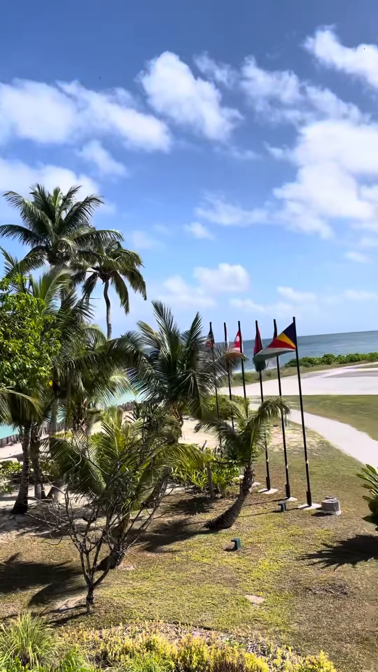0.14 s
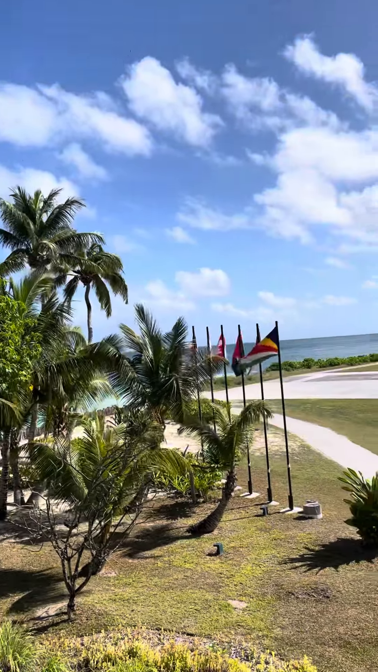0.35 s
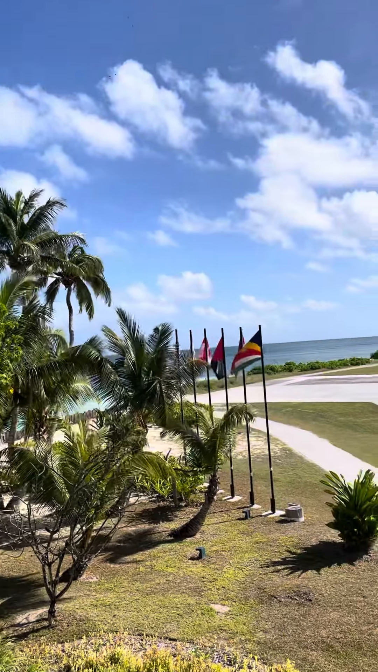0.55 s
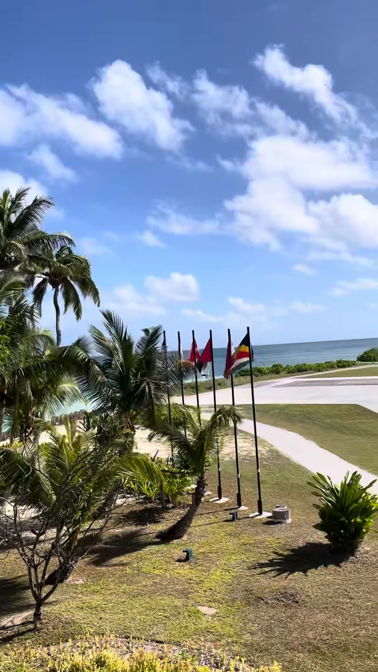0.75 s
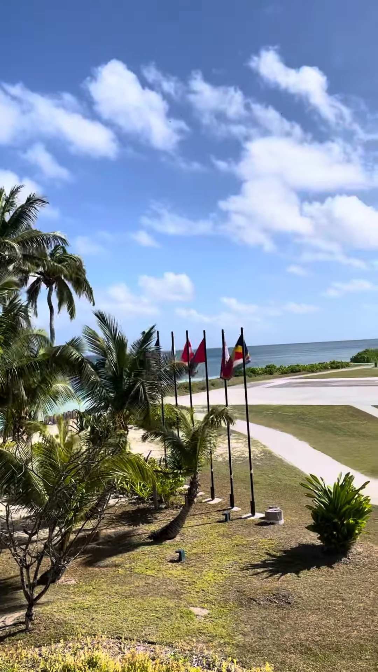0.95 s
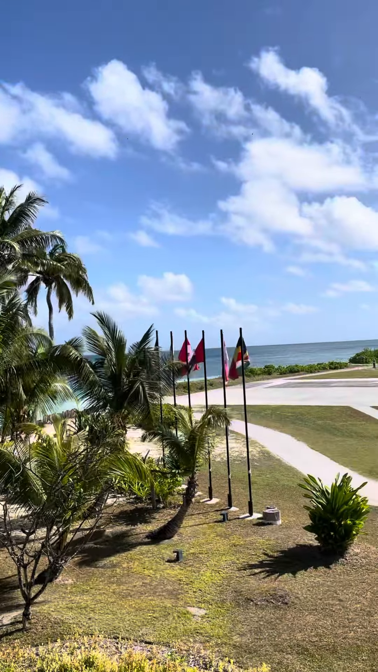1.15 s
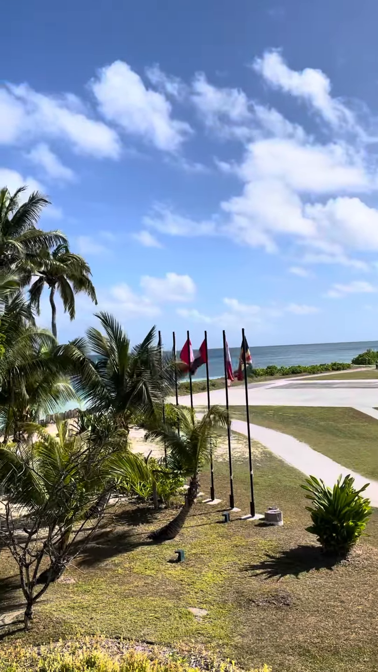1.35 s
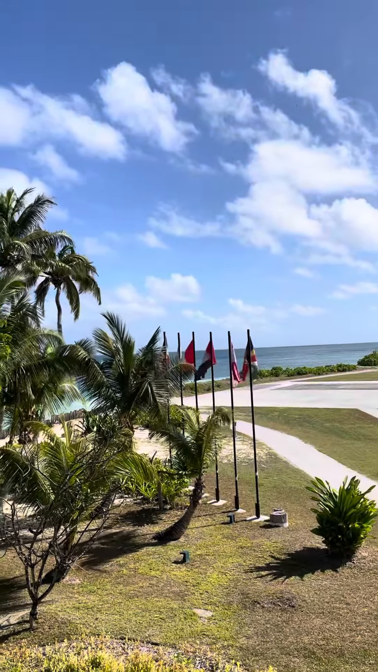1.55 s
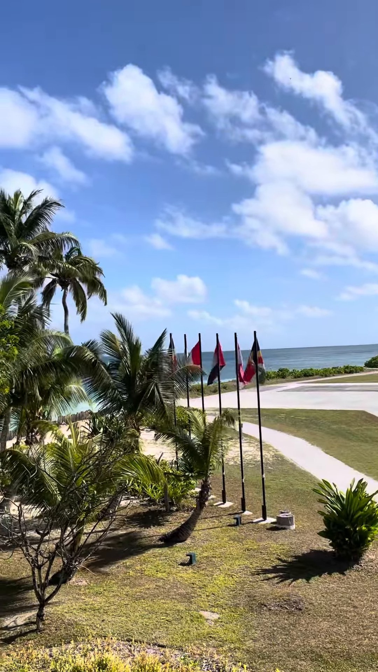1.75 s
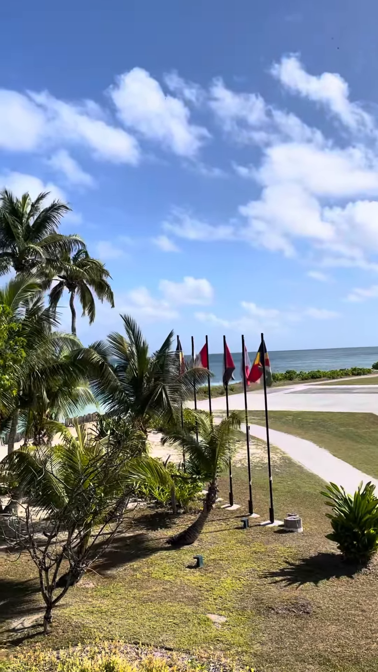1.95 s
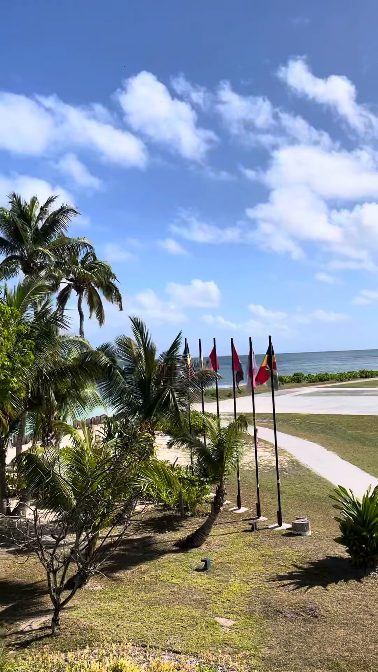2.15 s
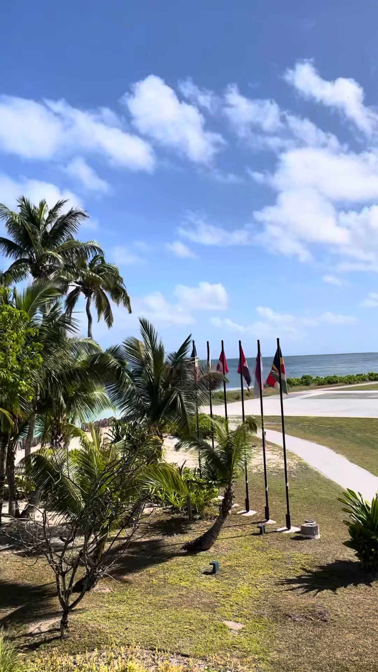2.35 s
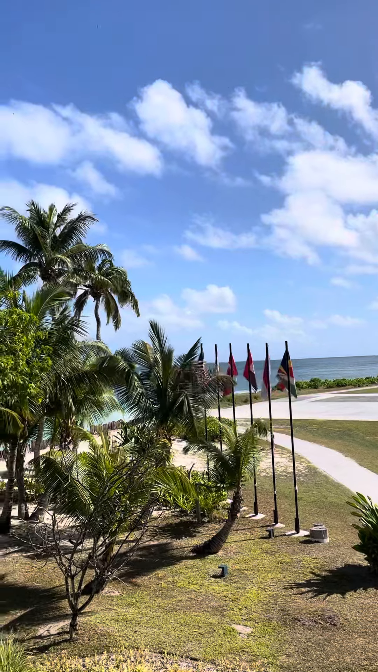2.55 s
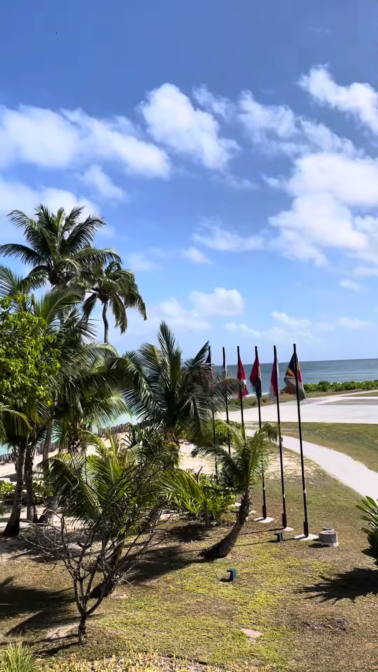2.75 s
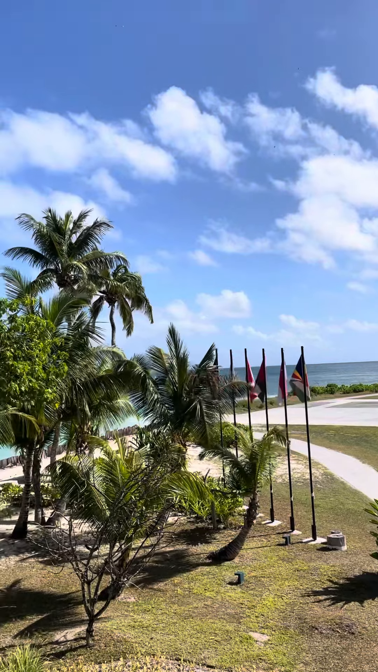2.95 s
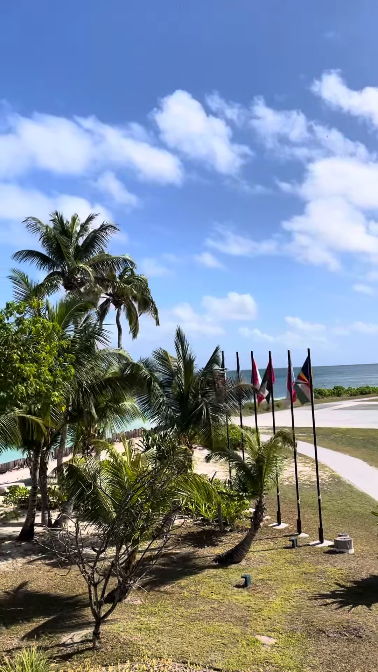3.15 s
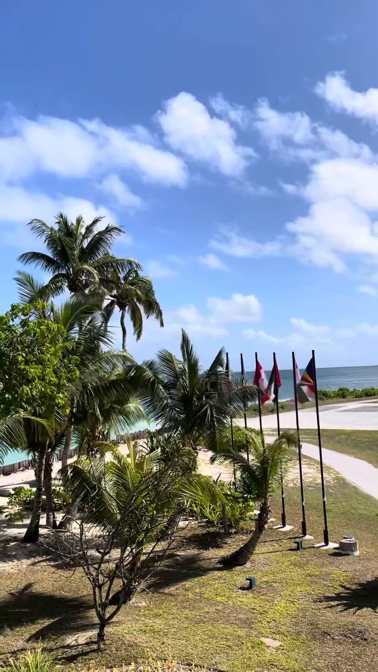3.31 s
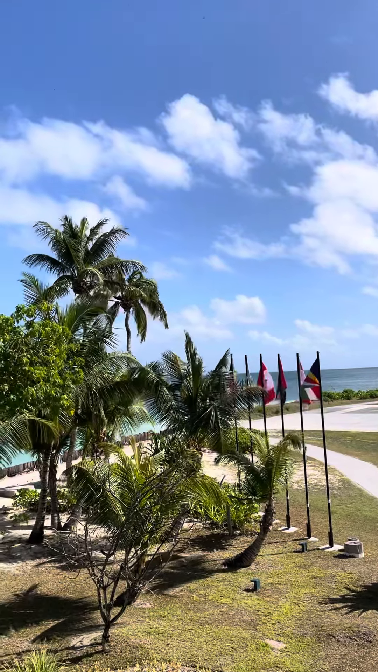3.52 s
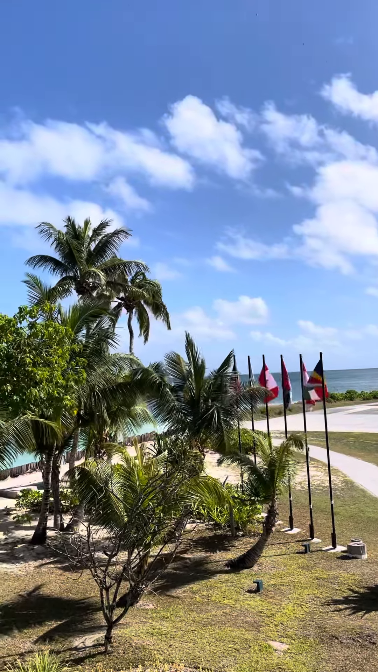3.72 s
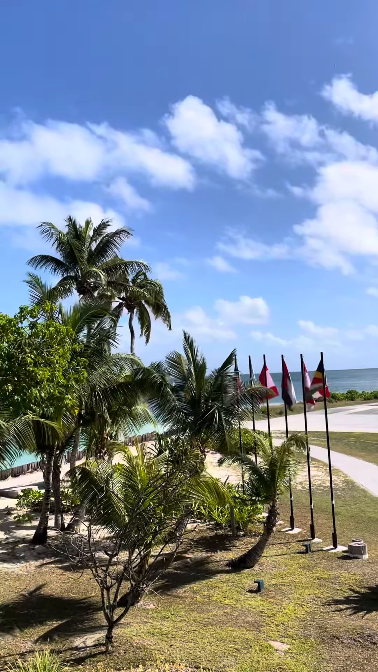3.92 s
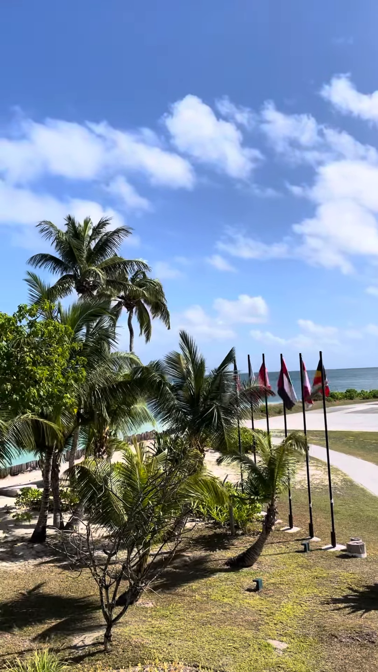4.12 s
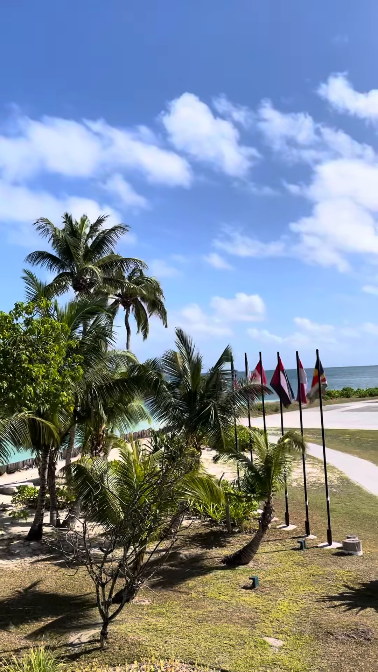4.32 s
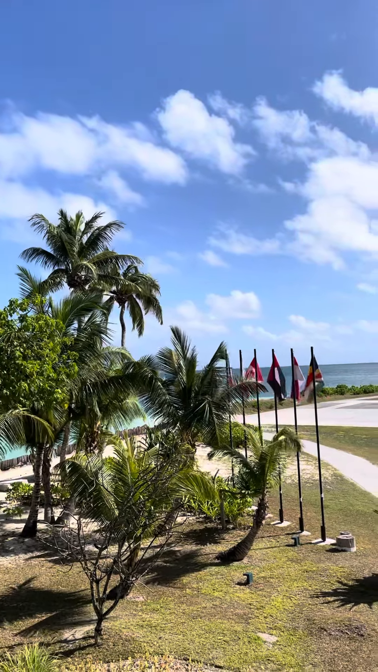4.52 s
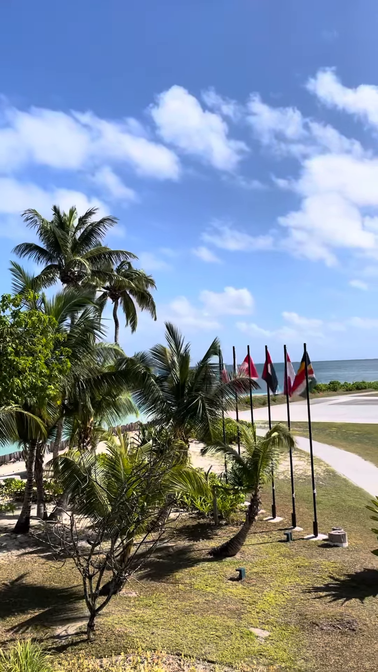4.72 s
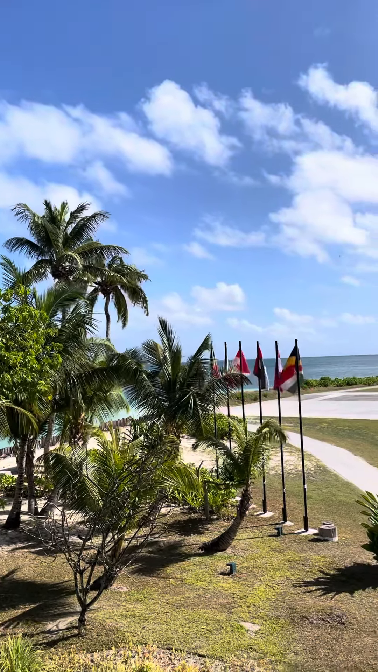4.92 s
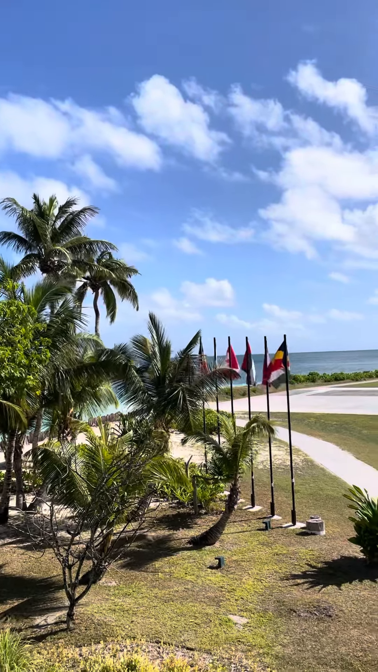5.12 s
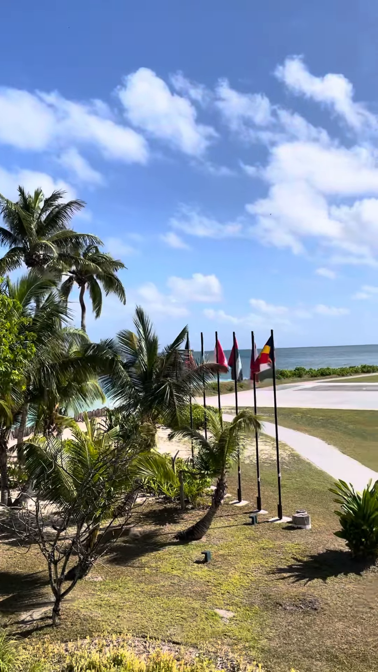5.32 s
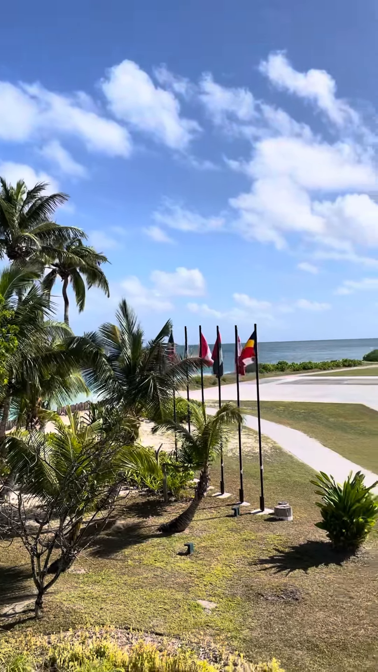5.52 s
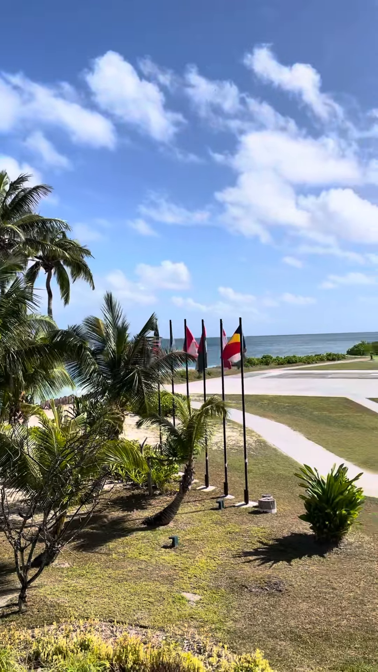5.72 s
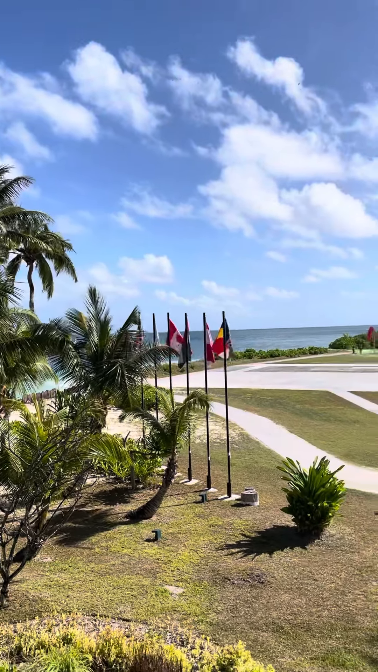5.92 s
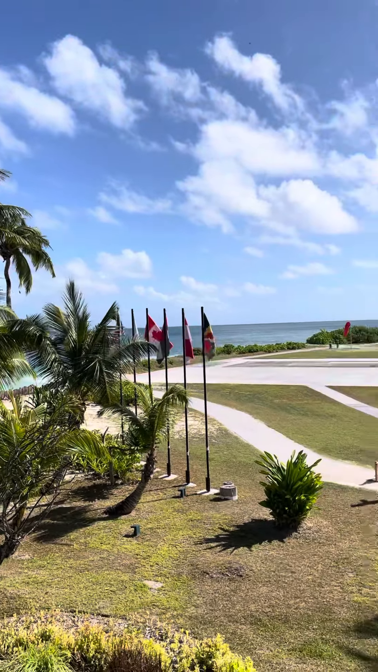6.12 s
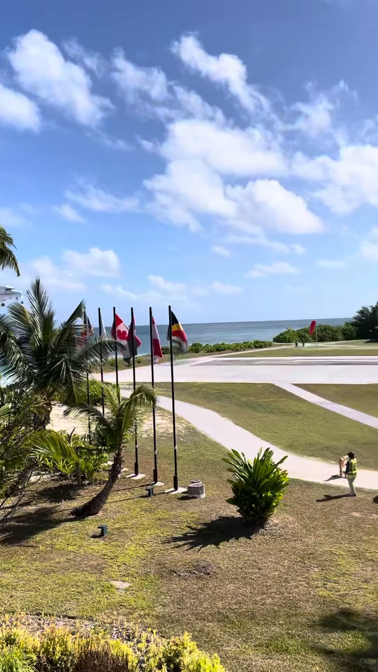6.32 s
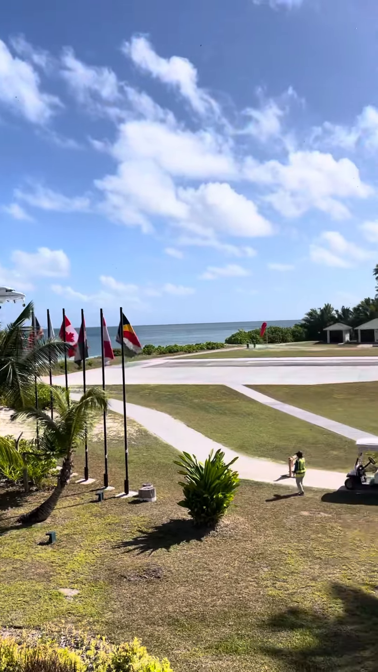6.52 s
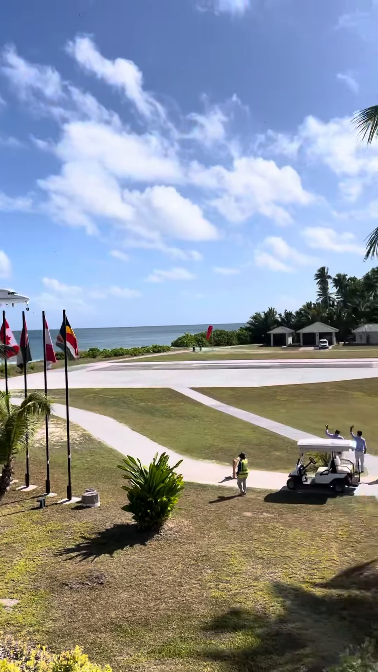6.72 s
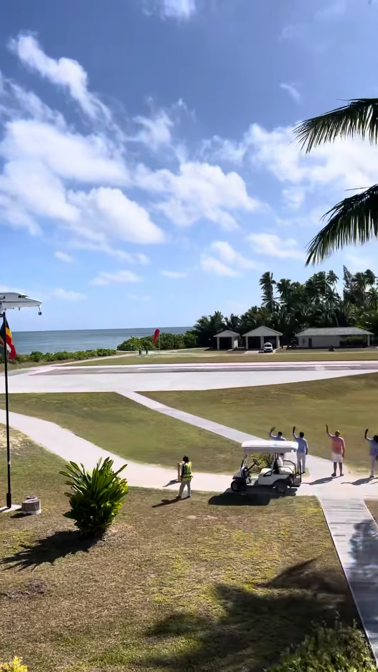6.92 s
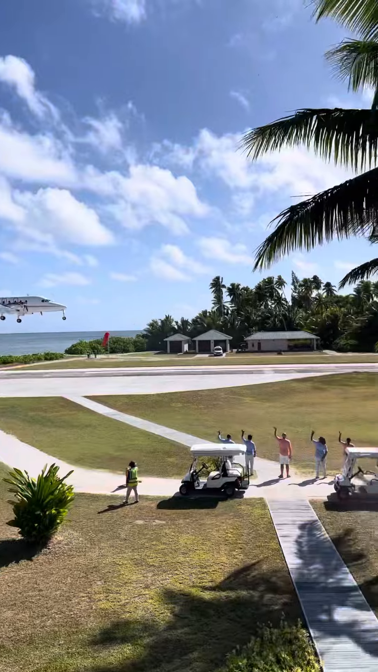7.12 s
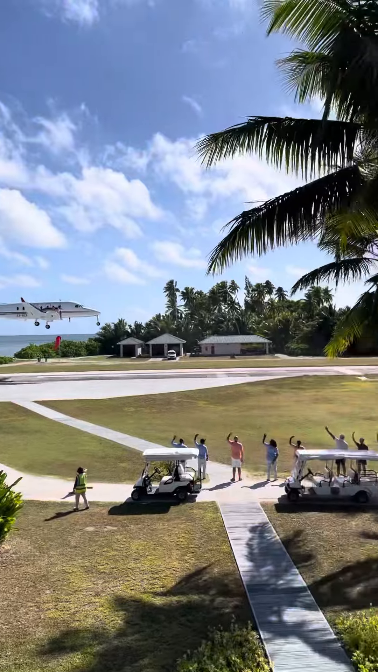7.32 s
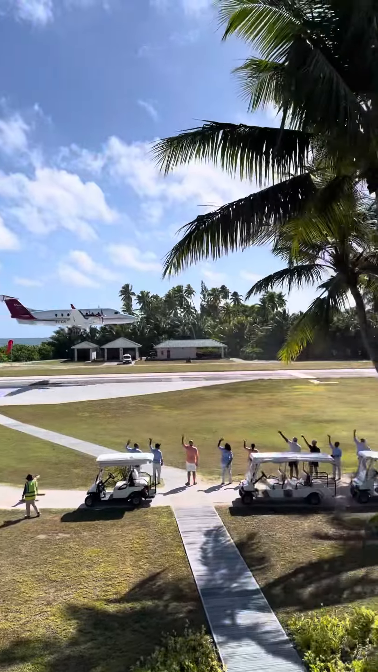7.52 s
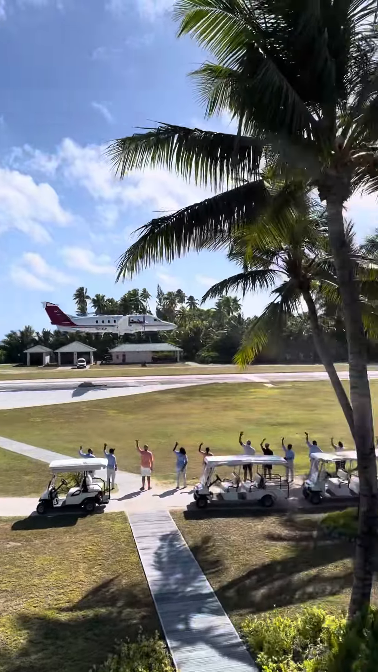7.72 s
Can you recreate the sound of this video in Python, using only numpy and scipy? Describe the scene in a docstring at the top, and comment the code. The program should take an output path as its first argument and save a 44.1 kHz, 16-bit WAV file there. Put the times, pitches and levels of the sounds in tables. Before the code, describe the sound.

A small twin turboprop approaches from far off, its hollow rushing roar building over quiet surf and light wind on the microphone. Early on come a faint insect buzz and two tiny bird ticks, then a short microphone bump. The propeller hum swells, and the high whine and hiss turn suddenly brighter as the plane nears. Its tones slide down as it goes by close to the listener.

```python
"""Surf and breeze on a shore, with a faraway roar; an insect buzzes once, then a small bird ticks twice.
The roar grows into a twin turboprop that comes in low and passes close by on its way to the runway.
Its exhaust and churned air rush, made hollow by an echo off the ground. Its propeller blades hum and
its turbines whine, brighter once it clears the palms. The tones sink as it goes by (Doppler effect)."""
import sys
import numpy as np
from scipy import signal
from scipy.fft import rfft, irfft, next_fast_len
from scipy.io import wavfile
from scipy.ndimage import uniform_filter1d, map_coordinates

SR = 44100
rng = np.random.default_rng(int(sys.argv[2]) if len(sys.argv) > 2 else 0)


def inscribe(sig):
    """Save sig as 16-bit PCM at rate SR to the path in sys.argv[1].

    A 1-D sig is mono; a 2-D sig holds one channel per row.
    Samples are clipped to [-1, 1] before scaling.
    """
    pcm = np.round(np.clip(np.atleast_2d(sig).T, -1, 1) * 32767)
    wavfile.write(sys.argv[1], SR, pcm.astype(np.int16))


N = 346493
T = np.arange(N) / SR


def amp(db):
    """Turn decibels into a gain to multiply by."""
    return 10 ** (np.asarray(db) / 20)


def unit(x):
    """Scale a signal to an average (rms) level of 1."""
    return x / np.sqrt(np.mean(x ** 2) + 1e-20)


def step(x, middle, width):
    """A smooth rise from 0 to 1."""
    return .5 + .5 * np.tanh((x - middle) / (2 * width))


def bump(x, middle, width):
    """A bell shape of height 1."""
    return np.exp(-((x - middle) / width) ** 2)


def along(points, hz):
    """Read between (Hz, value) rows on a logarithmic frequency scale."""
    known_hz, values = np.transpose(points)
    return np.interp(np.log(hz + 1), np.log(known_hz + 1), values)


def over_time(rows):
    """Join (seconds, value) rows into one value per sample."""
    return np.interp(T, *np.transpose(rows))


def turning(hz):
    """The running phase, in radians, of a changing frequency."""
    return 2 * np.pi * np.cumsum(hz) / SR


def wobble(rate):
    """A smooth random curve of level 1, through `rate` points a second."""
    points = rng.standard_normal(int(N * rate / SR) + 4)
    return unit(map_coordinates(points, [T * rate]))


def filtered(x, response):
    """Give each frequency in x the gain response(hz)."""
    size = next_fast_len(N + SR // 4)
    return irfft(rfft(x, size) * response(np.fft.rfftfreq(size, 1 / SR)), size)[..., :N]


def delayed(x, ms):
    """Delay one channel by a steady or changing time."""
    return map_coordinates(x, [(T - ms / 1e3) * SR], order=3, mode="mirror")


def fuzzy_tone(phase, width_hz):
    """A band of noise of level 1, centred on a moving pitch."""
    def band(hz):
        return 1 / np.sqrt(1 + (hz / width_hz) ** 2 + (hz / (1.7 * width_hz)) ** 10)
    a, b = filtered(rng.standard_normal((2, N)), band)
    return unit(a * np.cos(phase) + b * np.sin(phase))


def fuzzy_tones(tones, phase):
    """Several bands of noise, each on a multiple of one moving pitch."""
    return sum(amp(db) * fuzzy_tone(multiple * phase, width_hz) for multiple, width_hz, db in tones)


# How alike left and right are for aircraft and insect. Each row: frequency in Hz, likeness from 0 to 1.
LIKENESS = [(100, 1), (300, 1), (700, 0.89), (1000, 0.91), (2200, 1), (5000, 0), (6500, 0.86), (9500, 1)]


def rush(spectrum, likeness=LIKENESS):
    """Stereo noise of level 1; the spectrum sets only its tone colour."""
    def colour(hz):
        spread = np.arccos(np.clip(along(likeness, hz), 0, 1)) / 2
        return amp(along(spectrum, hz)) * [np.cos(spread), np.sin(spread)]
    mid, side = filtered(rng.standard_normal((2, N)), colour)
    return unit(np.array([mid + side, mid - side]))


# The tone colours of surf and breeze. Each row: frequency in Hz, relative level in dB.
SURF_COLOUR = [(20, -40), (40, -9), (60, 1.5), (135, 4.5), (190, -5.5), (280, 0.5), (500, -5), (800, -6),
               (1100, -5), (1650, -19.5), (3000, -18), (6000, -34), (8000, -84), (15000, -64)]
BREEZE_COLOUR = [(15, -53.5), (35, -6), (60, 11.5), (100, -4.5), (200, -12), (600, -53.5), (2000, -120)]
# How alike left and right are for both. Each row: frequency in Hz, likeness from 0 to 1.
SHORE_LIKENESS = [(60, 0.82), (300, 0.93), (1000, 0.77), (3000, 0.84)]
# Puffs of breeze. Each row: middle in seconds, level in dB, half length in seconds.
BREEZE_PUFFS = [(0.313, -27, 0.036), (2.295, -26.5, 0.05), (2.844, -30, 0.068), (3.018, -41, 0.11),
                (4.13, -30, 0.017), (6.578, -32, 0.029), (7.05, -31, 0.22)]


def shore():
    """Surf rushes steadily while the breeze buffets the microphone in soft puffs."""
    surf = amp(-33.5 + 0.45 * wobble(6.7)) * rush(SURF_COLOUR, SHORE_LIKENESS)
    surf[1] = delayed(surf[1], ms=0.13)  # the sea lies to the left
    puffs = sum(amp(db) * bump(T, s, half_s) for s, db, half_s in BREEZE_PUFFS)
    breeze = (puffs + amp(-52.5 + 3 * wobble(11.0))) * rush(BREEZE_COLOUR, SHORE_LIKENESS)
    return surf + breeze


def thump(s, db, hz, half_s):
    """One soft, low thump at the microphone."""
    return amp(db) * bump(T, s, half_s) * np.sin(2 * np.pi * hz * (T - s))


# The tone colour of the buzz. Each row: frequency in Hz, relative level in dB.
INSECT_COLOUR = [(3500, -21), (4450, 1), (4900, 8.5), (5300, 2), (5750, -1), (6300, -18), (7500, -42)]


def insect(start_s=0.22, end_s=0.56, edge_s=0.026):
    """An insect buzzes once: a short burst of high, trembling noise."""
    buzzing = step(T, start_s, edge_s) - step(T, end_s, edge_s)
    return buzzing * amp(-50.5 + 1.5 * wobble(60)) * rush(INSECT_COLOUR)


# The bird's ticks. Each row: middle in seconds, level in dB, starting pitch in Hz, ending pitch in Hz.
BIRD_TICKS = [(1.8015, -49.5, 12200, 5900), (1.857, -48.5, 11100, 6800)]


def bird(half_s=0.0042, half_fall_s=0.0092, leaves_db=-2, tail_s=0.12):
    """A small bird makes quick falling ticks, and the leaves scatter each into a short tail."""
    ticks = np.zeros(N)
    for s, db, start_hz, end_hz in BIRD_TICKS:
        glide_hz = np.interp(T, [s - half_fall_s, s + half_fall_s], [start_hz, end_hz])
        ticks += amp(db) * bump(T, s, half_s) * np.sin(turning(glide_hz))
    tail = rng.standard_normal((2, SR // 4)) * amp(-60 * T[:SR // 4] / tail_s)
    scatter = signal.fftconvolve(ticks[None], tail / np.linalg.norm(tail[0]), axes=1)[:, :N]
    return ticks + amp(leaves_db) * scatter


SPEED_M_PER_S, SOUND_M_PER_S = 40, 343
MACH = SPEED_M_PER_S / SOUND_M_PER_S


def flight(closest_m=38.45, side_on_s=7.66):
    """On a straight flight: our distance and angle off the nose when the sound left the aircraft."""
    past_m = SPEED_M_PER_S * (T - side_on_s + closest_m / SOUND_M_PER_S)
    squeeze = 1 - MACH ** 2
    range_m = (np.sqrt(past_m ** 2 + squeeze * closest_m ** 2) - MACH * past_m) / squeeze
    return range_m, np.degrees(np.arctan2(closest_m, MACH * range_m - past_m))


def carried(range_m, air_db_per_m=0):
    """Sound spreads out and is soaked up by the air; the gain is 1 at 100 metres."""
    return 100 / range_m * amp(-air_db_per_m * (range_m - 100))


def chopped(phase, in_open, depth=0.15):
    """A gain that pulses once for each passing blade when the aircraft is in the open."""
    return 1 + depth * in_open * np.cos(phase)


# Brief swells and dips. Each row: middle in seconds, half length in seconds, then the change in dB
# of the propeller wash, of the hiss and of the whine.
SWELLS_AND_DIPS = [(6.283, 0.046, 0.8, 0.5, 1), (6.599, 0.024, 0, -1.7, 3), (6.674, 0.056, -3.5, 2.4, 1.5),
                   (6.85, 0.039, 5, 2.1, 1.5), (6.96, 0.027, 2.5, 2, 1.3), (7.032, 0.015, 6.5, 4, 2.5),
                   (7.048, 0.025, -3, -0.3, 4.5), (7.283, 0.054, 2, -0.2, 5.5), (7.717, 0.017, 2, 1.8, 3.5)]


def swells_and_dips():
    """Brief swells and dips in the loudness of wash, hiss and whine, as three curves in dB."""
    return sum(np.outer(levels_db, bump(T, s, half_s)) for s, half_s, *levels_db in SWELLS_AND_DIPS)


# The compressor's tones. Each row: multiple of the blade rate, width in Hz, relative level in dB.
WHINE_TONES = [(76.8, 135, -2.5), (75.7, 250, -4.5), (74.5, 500, -5)]
# How their pitch wavers. Each row: time in seconds, pitch change in percent.
WHINE_WAVER = [(0, 0), (2.5, 0.5), (5.6, 0.8), (6.35, 0.6), (6.6, -0.4), (6.77, -1.3), (6.95, 0.1),
               (7.07, -0.3), (7.86, -0.2)]


def whine(phase, range_m, angle_deg, in_open, swell_db):
    """The compressor's whine beams forward, smeared by the airflow; air and palms swallow much of it."""
    beam_db = -11 * step(angle_deg, 66, 9.1)
    far_db = -4.5 * (1 - step(T, 1.9, 0.3))  # weaker still at the start
    flicker_db = (0.1 + 1.2 * in_open) * wobble(45)
    level = amp(-49.5 + 8 * in_open + beam_db + far_db + swell_db + flicker_db)
    wavering_phase = np.cumsum(np.gradient(phase) * (1 + over_time(WHINE_WAVER) / 100))
    tones = chopped(phase, in_open) * fuzzy_tones(WHINE_TONES, wavering_phase)
    return carried(range_m, air_db_per_m=0.0758) * level * tones


def turbine_band(phase, angle_deg, multiple, width_hz, db, db_per_deg):
    """A broad, fluttering band of turbine noise whose level depends on the angle off the nose."""
    level = amp(db + db_per_deg * (angle_deg - 90) + 1.2 * wobble(16))
    return level * fuzzy_tone(multiple * phase, width_hz)


# Two bands of turbine noise. Each holds: multiple of the blade rate, width in Hz,
# level in dB from the side at 100 metres, change in dB per degree towards the tail.
SCREECH_BAND = (78, 620, -52, -0.11)
SIZZLE_BAND = (85, 1500, -49, 0.08)


def turbines(phase, range_m, angle_deg, in_open, swell_db):
    """The turbines whine; in the open they add a rough screech and a wide sizzle."""
    intakes = whine(phase, range_m, angle_deg, in_open, swell_db)
    reach = in_open * carried(range_m)
    intakes += reach * turbine_band(phase, angle_deg, *SCREECH_BAND)
    sizzle = reach * np.array([turbine_band(phase, angle_deg, *SIZZLE_BAND) for _ in range(2)])
    return np.array([intakes, delayed(intakes, ms=0.088)]) + sizzle


# The hum swells and sags on the way in. Each row: time in seconds, level in dB.
HUM_LEVEL = [(0, -57.5), (4.7, -35.5), (5.05, -29.5), (5.5, -28.5), (5.8, -38.5), (6.1, -22.5), (6.4, -18),
             (6.83, -16), (6.97, -25), (7.25, -21.5), (7.55, -19), (7.86, -20.5)]
# Its overtones, each beamed its own way. Each row: multiple of the blade rate, relative level in dB,
# beam direction in degrees off the nose, half the beam's width in degrees.
HUM_OVERTONES = [(2, 4.5, 64.7, 21), (3, -1, 77.7, 16), (4, -12, 99, 26), (5, -11, 78, 25),
                 (6, -10, 56, 27), (7, -8.5, 55, 19)]


def propellers(phase, range_m, angle_deg, beam_db=9.5):
    """Passing blades hum; as the propellers turn edge-on, overtones sharpen each cycle into a pulse."""
    blade = phase + 0.07 * wobble(12)
    hum = amp(over_time(HUM_LEVEL) + 0.4 * wobble(9.3)) * unit(np.sin(blade))
    overtones = np.zeros(N)
    for multiple, db, beam_deg, width_deg in HUM_OVERTONES:
        level_db = db + beam_db * bump(angle_deg, beam_deg, width_deg) + 0.68 * wobble(6.2)
        overtones += amp(level_db) * unit(np.sin(multiple * blade))
    return hum + carried(range_m) * amp(-39.5) * overtones


# The tone colour of the exhaust. Each row: frequency in Hz, relative level in dB.
EXHAUST_COLOUR = [(25, -50), (55, -6.5), (90, -9), (150, -1.5), (205, 2), (300, -4), (500, -3.5),
                  (900, -29), (2000, -88)]


def exhaust(range_m, angle_deg):
    """The exhaust rumbles, more weakly towards the side."""
    side_db = -13 * np.sin(np.radians(angle_deg)) ** 2
    return amp(-20 + side_db) * carried(range_m, air_db_per_m=0.03) * rush(EXHAUST_COLOUR)


# The tone colour of the wash. Each row: frequency in Hz, relative level in dB.
WASH_COLOUR = [(25, -50), (150, -18), (300, -3), (430, 1.5), (600, 1), (900, 1), (1150, -8), (1450, -11),
               (1650, -23.5), (2400, -33.5), (4000, -43.5), (8000, -84)]


def propeller_wash(phase, in_open, drive_db):
    """The air thrown back by the propellers rushes, chopped by the blades."""
    return amp(drive_db - 2.5 + 0.46 * wobble(13)) * chopped(phase, in_open) * rush(WASH_COLOUR)


# The hiss from far away and from close by. Each row: frequency in Hz, relative level in dB.
DULL_HISS = [(500, 5), (1300, 6), (2050, 5.5), (2700, -2), (3150, -2), (3550, -6), (3900, -7),
             (5500, -14.5), (9000, -74), (14000, -67.5)]
BRIGHT_HISS = [(500, -13.5), (1300, 4.5), (2100, 1.5), (2450, 3.5), (2950, 3), (3200, 4.5), (3550, 0),
               (3780, 1.5), (4900, -2.5), (5600, -0.5), (6200, -1.5), (6800, -4.5), (7500, -59.5),
               (10000, -66.5), (15000, -44)]
# Two faint, narrow ringing bands in the hiss.
# Each row: multiple of the blade rate, width in Hz, relative level in dB.
RINGING_BANDS = [(13.3, 46, -23.5), (24.03, 110, -21)]


def intake_hiss(phase, range_m, in_open, drive_db):
    """The intakes hiss, dulled by air and palms until close and in the open; two faint bands ring."""
    near = np.clip(0.42 * bump(range_m, 0, 308) + 0.31 * in_open, 0, 1)
    hiss = np.sqrt(1 - near ** 2) * rush(DULL_HISS) + near * rush(BRIGHT_HISS)
    flutter_db = 0.36 * wobble(23) + 0.83 * near * wobble(26)  # close by, eddies off the wings
    level = amp(drive_db - 10 + 6 * in_open + flutter_db)
    return level * (chopped(phase, in_open) * hiss + fuzzy_tones(RINGING_BANDS, phase))


# Hollow bands in the roar. Each row: middle in seconds, half length in seconds, pitch as a multiple
# of 1 / echo lag, width in Hz, level in dB compared with the roar's strength.
HOLLOW_BANDS = [(1.4, 0.9, 4.93, 54, -14), (0.88, 1.13, 3.7, 75, -8.5), (1.53, 0.4, 1.12, 50, -7),
                (1.43, 0.44, 2.02, 22, -10), (2.32, 0.57, 3.55, 84, -7), (3.31, 0.65, 1.98, 25, -2.5),
                (3.61, 1.3, 3.3, 49, -3.5), (3.4, 1.13, .87, 56, -6), (3.36, 1.27, 1.24, 43, -8),
                (3.3, 0.7, 3.98, 30, -12.5), (4.5, .42, 1.98, 48, -2.5), (4.92, 0.24, .88, 22, -3.5),
                (5.0, 0.25, 3.7, 35, -8), (5.4, 0.2, 1.99, 46, -2), (6, .07, 2.02, 13, 1.5),
                (4.4, 0.22, 3.85, 49, -10.5), (5.16, 0.22, 1.6, 35, -4), (5.8, 0.19, 2, 36, -4.5),
                (6.95, 0.09, 3.3, 74, -1.5), (7.17, 0.48, 1.55, 22, -8), (5.6, .04, 4.1, 130, -8.5),
                (7.0, 0.24, 5.7, 88, -7), (7.82, 0.42, 6.5, 91, -0.5), (7.68, 0.29, 4.2, 50, -2.5)]


def hollow_bands(lag_ms):
    """Bands swell out of the roar and sink as the ground echo falls further behind."""
    lag_phase = turning(1e3 / lag_ms)
    return sum(amp(db) * bump(T, s, half_s) * fuzzy_tone(multiple * lag_phase, width_hz)
               for s, half_s, multiple, width_hz, db in HOLLOW_BANDS)


def ground_echo(direct, lag_ms, share=0.35, cutoff_hz=1500):
    """Add a late copy off the rough ground, which returns only the lower frequencies."""
    bounce = filtered(direct, lambda hz: 1 / (1 + (hz / cutoff_hz) ** 2))
    echo = np.array([delayed(side, lag_ms) for side in bounce])
    return (direct + share * echo) / np.sqrt(1 + share ** 2)


def turbulence(x, depth_db):
    """Moving air focuses and scatters the sound, so patches of frequencies rise and fall."""
    spectra = signal.stft(x, nperseg=512)[2]
    patches = uniform_filter1d(rng.standard_normal(spectra.shape[1:]), size=9, axis=0)
    patches = uniform_filter1d(patches, size=14, axis=1)
    return signal.istft(spectra * amp(depth_db * unit(patches)), nperseg=512)[1][:, :N]


def wall_echoes(x, angle_deg, level_db, count=4):
    """Nearby walls and trunks add weak copies of the treble, whose lags drift as the aircraft moves."""
    treble = filtered(x, lambda hz: hz / np.hypot(hz, 900))
    paths = rng.uniform((3, 0), (22, 2 * np.pi), (2, count, 2))
    copies = np.zeros((2, N))
    for side in range(2):
        for ms, bearing in paths[side]:
            lag_ms = ms * (1 + np.cos(np.radians(angle_deg) - bearing) / 2)
            copies[side] += delayed(treble[side], lag_ms)
    return x + amp(level_db) * copies / np.sqrt(count)


# Gaps in the roar. Each row: middle in seconds, half length in seconds, frequency in Hz,
# how fast it sinks in Hz per second, width in Hz, level change in dB.
ROAR_GAPS = [(1.35, 0.26, 673, 15, 48, -17), (1.35, 0.43, 880, 14, 38, -17),
             (2.3, 0.28, 188, 26, 37.3, -4.5), (2.25, 0.58, 492, 25, 40.3, -7.5),
             (2.3, 0.5, 1245, 60, 65.4, -3), (3.245, 0.45, 452, 40, 36.4, -9.5),
             (3.6, 0.59, 740, 15, 41.2, 0), (4.096, 0.95, 1034, 25, 52.5, -8.5),
             (4.2, 0.35, 394, 80, 30, -6.5), (4.8, 0.25, 826, 81, 110, -2), (5.22, 0.3, 284, 41, 28, -8.5),
             (5.306, 0.32, 202, 30, 35, -3.5), (7.204, 0.29, 317, 33, 28, -5.5)]


def echo_gaps(x):
    """Echoes cancel narrow bands of the roar; the gaps open, sink and close as the aircraft moves."""
    hz, t, spectra = signal.stft(x, SR, nperseg=4096)
    gaps_db = sum(db * bump(t, s, half_s) * bump(hz[:, None], centre_hz - sink * (t - s), width_hz)
                  for s, half_s, centre_hz, sink, width_hz, db in ROAR_GAPS)
    return signal.istft(spectra * amp(gaps_db), SR, nperseg=4096)[1][:, :N]


# The strength that wash, hiss and hollow bands follow. Each row: time in seconds, level in dB.
ROAR_STRENGTH = [(0.0, -37.5), (0.5, -38), (1.4, -30.5), (2.1, -25), (2.55, -24), (2.85, -26), (3.2, -25),
                 (4.5, -23.5), (5.2, -22.5), (5.5, -22), (5.58, -23.5), (6.05, -21), (6.3, -19),
                 (6.48, -18.5), (7.02, -19.5), (7.12, -19), (7.45, -22.5), (7.72, -21), (7.86, -22)]
# How far the ground echo trails the direct sound. Each row: time in seconds, lag in milliseconds.
GROUND_LAG = [(0, 3.67), (2.1, 3.41), (2.95, 3.48), (3.6, 3.57), (4.25, 3.54), (4.55, 3.76), (4.85, 3.73),
              (5.2, 4.24), (5.5, 4.98), (6.3, 6.6), (7, 8.3), (7.86, 9.84)]


def roar(phase, range_m, angle_deg, in_open, wash_change_db, hiss_change_db):
    """Exhaust, propeller wash and intake hiss arrive through moving air, along with their echoes."""
    strength_db, lag_ms = over_time(ROAR_STRENGTH), over_time(GROUND_LAG)
    direct = exhaust(range_m, angle_deg)
    direct += propeller_wash(phase, in_open, strength_db + wash_change_db)
    direct += intake_hiss(phase, range_m, in_open, strength_db + hiss_change_db)
    hollow = ground_echo(direct, lag_ms) + amp(strength_db) * hollow_bands(lag_ms)
    stirred = turbulence(hollow, depth_db=1.24)
    return echo_gaps(wall_echoes(stirred, angle_deg, level_db=-8.0))


# How much sooner roar and hum reach the left side. Each row: time in seconds, lead in milliseconds.
LEFT_LEAD = [(0, 0.073), (2.5, 0.1), (5, 0.075), (7.86, 0.061)]


def aircraft(blade_hz=116.7, clears_palms_s=6.513):
    """Roar, propellers and turbines share one flight, so their tones sink together as it passes."""
    range_m, angle_deg = flight()
    in_open = step(T, clears_palms_s, 0.036)
    phase = turning(blade_hz / (1 - MACH * np.cos(np.radians(angle_deg))))  # Doppler effect
    wash_change_db, hiss_change_db, whine_swell_db = swells_and_dips()
    roaring = roar(phase, range_m, angle_deg, in_open, wash_change_db, hiss_change_db)
    left, right = roaring + propellers(phase, range_m, angle_deg)
    whining = turbines(phase, range_m, angle_deg, in_open, whine_swell_db)
    return np.array([left, delayed(right, over_time(LEFT_LEAD))]) + whining


def scene():
    """The aircraft over the sounds of the shore."""
    return aircraft() + shore() + bird() + insect() + thump(s=3.003, db=-12.5, hz=120, half_s=0.0032)


# The microphone's left opening hears the middle range louder.
# Each row: frequency in Hz, left minus right in dB.
LEFT_BOOST = [(60, 0), (200, 2.5), (390, 3.5), (540, 6), (720, 14.5), (950, 7), (1200, 8.5), (1900, 1.5),
              (3200, 2), (5500, 0), (12300, 0)]
# Its resonance also shifts the phase. Each row: frequency in Hz, the left's lead in radians.
LEFT_PHASE = [(100, 0.077), (350, -0.24), (600, 0.69), (820, -0.79), (1200, -0.45), (1700, -0.42),
              (2400, 0.48), (4000, -0.36)]


def record(dry, ceiling=0.95, top_hz=13300):
    """Two microphone openings colour the sound; high peaks are rounded and the top treble is cut."""
    def openings(hz):
        ratio = amp(along(LEFT_BOOST, hz))
        turn = np.exp(.5j * along(LEFT_PHASE, hz))
        return np.array([ratio * turn, 1 / turn]) * 2 / (1 + ratio)
    heard = filtered(dry, openings)
    rounded = heard / (1 + np.abs(heard / ceiling) ** 8) ** (1 / 8)
    return filtered(rounded, lambda hz: hz < top_hz)


dry = scene()
out = record(dry)
inscribe(out)
```